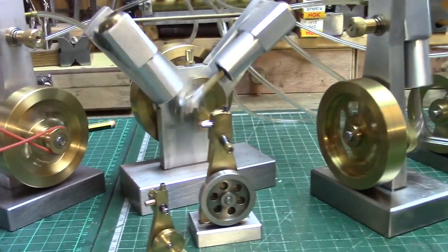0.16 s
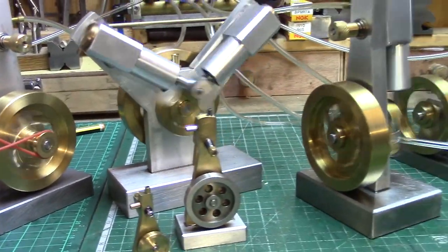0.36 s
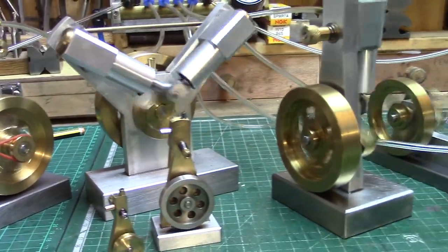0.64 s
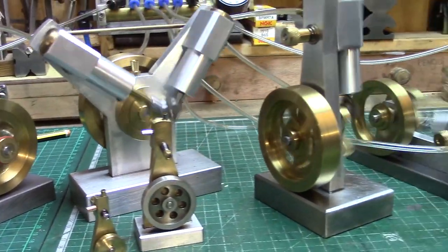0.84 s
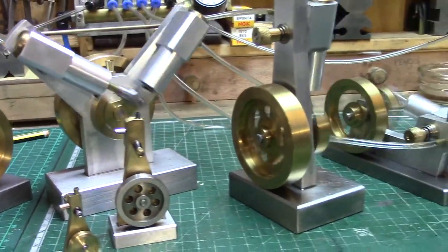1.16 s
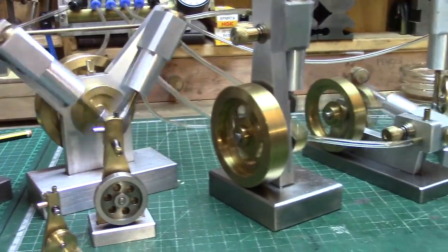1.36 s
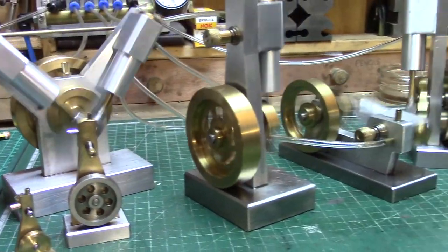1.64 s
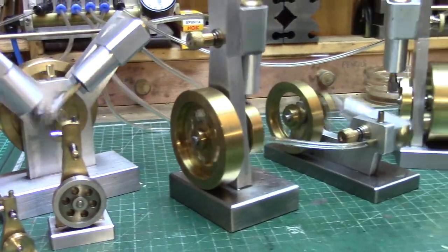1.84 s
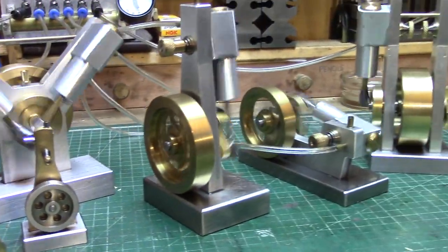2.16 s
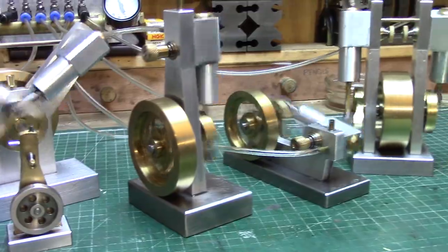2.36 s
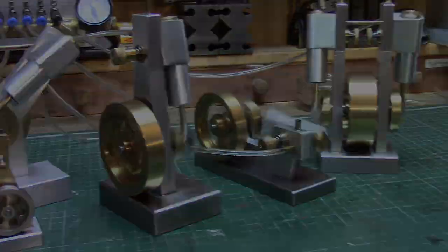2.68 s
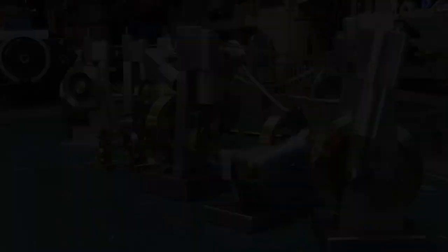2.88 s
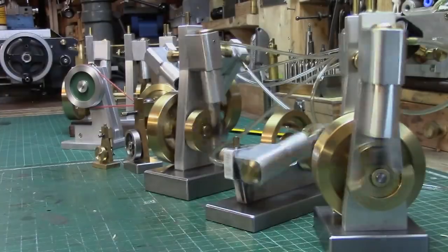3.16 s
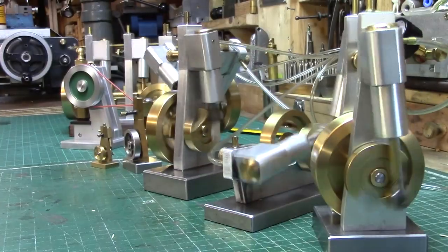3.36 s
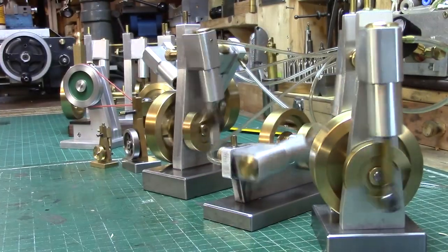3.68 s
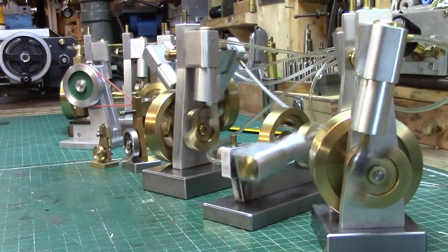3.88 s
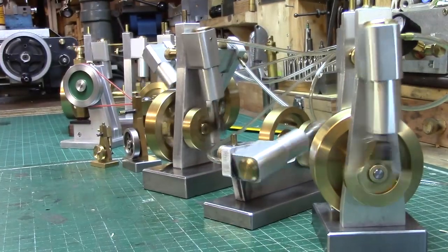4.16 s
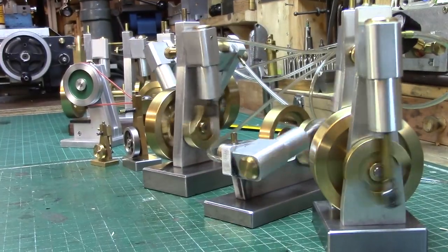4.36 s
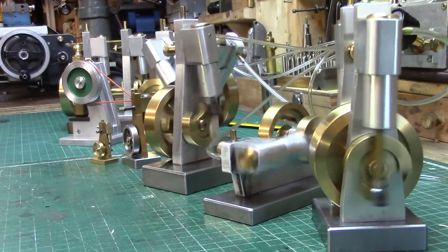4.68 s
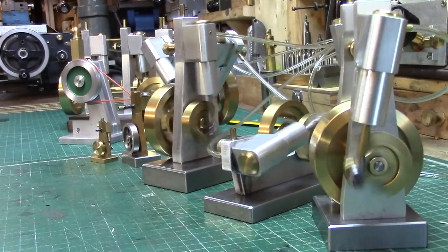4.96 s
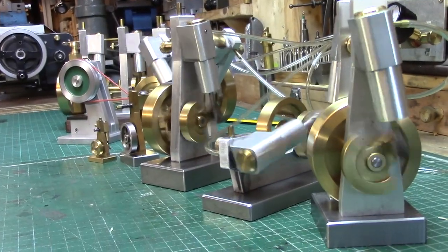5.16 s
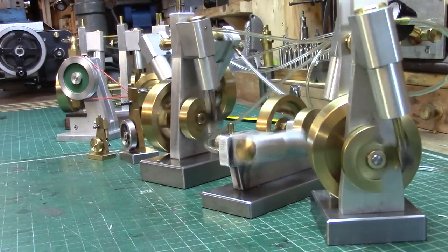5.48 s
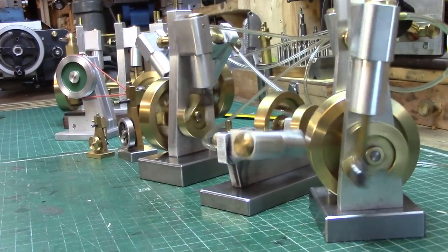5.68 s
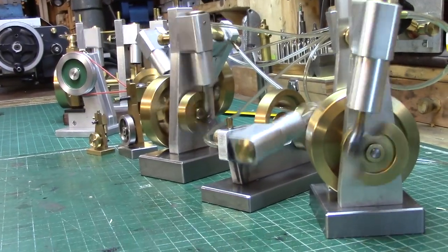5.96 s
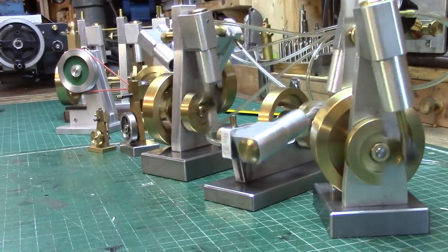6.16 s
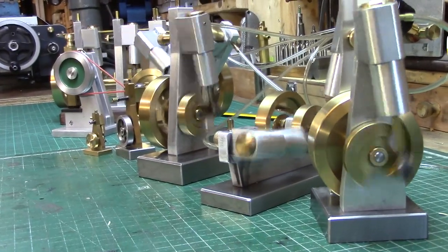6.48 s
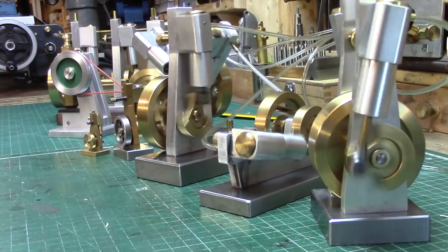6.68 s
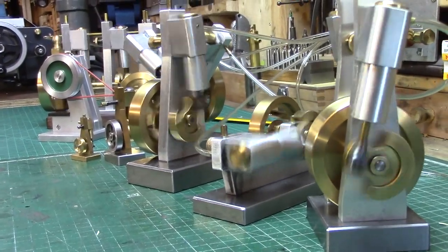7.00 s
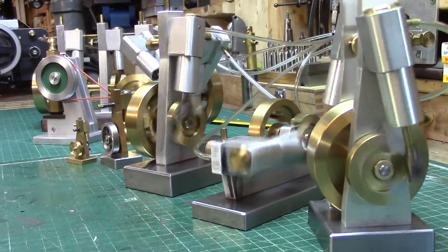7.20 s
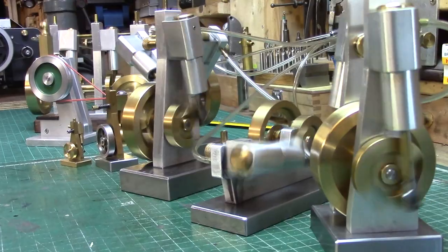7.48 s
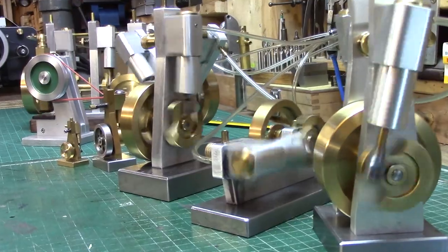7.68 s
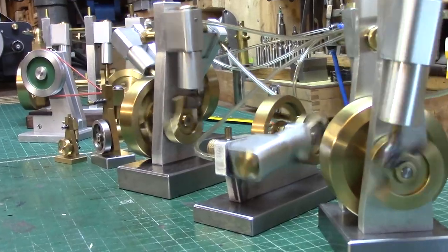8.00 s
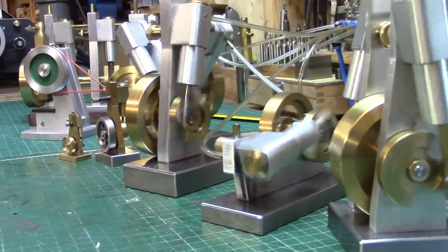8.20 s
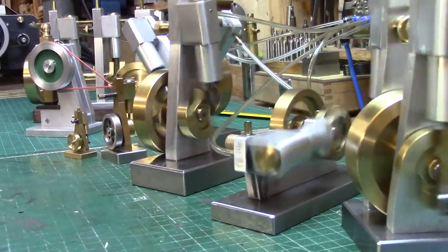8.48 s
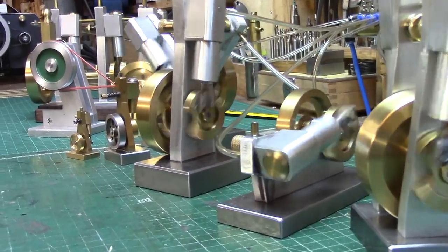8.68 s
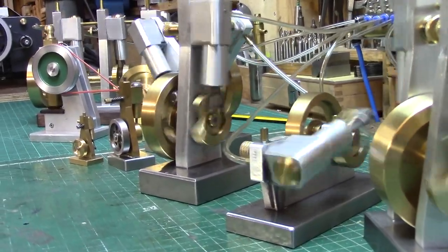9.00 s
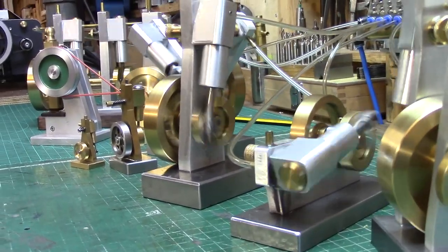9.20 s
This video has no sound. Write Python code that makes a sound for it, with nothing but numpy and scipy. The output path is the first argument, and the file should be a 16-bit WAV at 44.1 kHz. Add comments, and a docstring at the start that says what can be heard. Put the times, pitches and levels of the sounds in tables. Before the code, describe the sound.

Several model steam engines run on a wooden workshop bench. A fast one puffs about ten times a second, with brief squeaks and loose knocks, while steam hisses and spits from valves. A slower engine alternates a ringing metal clank with a dull thump. Around three seconds in, everything fades down, then builds back up, sounding wider and with a little more room echo.

```python
"""A small, fast steam engine puffs, squeaks and knocks on a wooden bench, about ten turns a second.
Each puff is steam let out by its rocking cylinder; the piston squeaks and the loose crank knocks.
A neighbouring engine spits, and steam hisses from leaking valves. A slow engine clanks its flywheel
at one end of its stroke and thumps the bench at the other. About three seconds in, the sound fades
down and comes back from a second listening spot, wider and with more of the room."""
import sys
import numpy as np
from scipy import signal
from scipy.fft import rfft, irfft, next_fast_len
from scipy.io import wavfile
from scipy.ndimage import map_coordinates

SR = 44100
rng = np.random.default_rng(int(sys.argv[2]) if len(sys.argv) > 2 else 0)


def dump_mix(stems):
    """Bounce the given channels to the path in sys.argv[1] as a 16-bit WAV at rate SR."""
    frames = np.atleast_2d(stems).T  # one column per channel
    limited = np.clip(frames, -1, 1)  # hard clip at full scale
    pcm = np.round(limited * 32767).astype(np.int16)
    wavfile.write(sys.argv[1], SR, pcm)


N = 411894
MOVE_S, TOP_HZ = 3.05, 16000  # when the listening spot changes; where the treble ends
TIME = np.arange(N) / SR  # seconds into the scene
AGE = np.arange(SR // 3) / SR  # seconds into one short sound


def amp(db):
    """Turn decibels into a gain."""
    return 10 ** (np.asarray(db) / 20)


def unit(x):
    """Scale a sound to an average (rms) level of 1."""
    return x / np.sqrt(np.mean(x ** 2))


def at(rows, s):
    """Read (time, value) rows at s seconds, joining them with straight lines."""
    return np.interp(s, *np.transpose(rows))


def by_spot(s, first, second):
    """One value at the first listening spot, another at the second."""
    return np.where(s < MOVE_S, first, second)


def clear_of(rows, s, gap_s):
    """True if no event in the table falls within gap_s of this moment."""
    return np.min(np.abs(np.transpose(rows)[0] - s)) > gap_s


def add(track, s, sound):
    """Mix a sound into a track at s seconds."""
    start = max(int(s * SR), 0)
    part = track[start:start + len(sound)]
    part += sound[:len(part)]


def colour(x, tone):
    """Shape a sound's tone with (pitch_hz, level_db) rows; the result has level 1."""
    hz, db = np.transpose(tone)
    size = next_fast_len(len(x))
    log_hz = np.log(np.maximum(np.fft.rfftfreq(size, 1 / SR), 1))
    gain = amp(np.interp(log_hz, np.log(hz), db))
    return unit(irfft(rfft(x, size) * gain, size)[:len(x)])


def wander(rate_hz):
    """A smooth random drift, about 1 in size."""
    steps = rng.standard_normal(N // 8)
    return unit(np.interp(TIME * rate_hz, np.arange(len(steps)), steps))


def swell(centre_s, width_s):
    """A bell-shaped rise and fall."""
    return np.exp(-.5 * ((AGE - centre_s) / width_s) ** 2)


def whistle(hz, width_hz):
    """A rough tone: a narrow band of noise whose pitch may move."""
    phase = 2 * np.pi * np.cumsum(hz * np.ones(N)) / SR
    return unit(wander(width_hz) * np.sin(phase) + wander(width_hz) * np.cos(phase))


def rasp(hz, flutter, flutter_hz=1500):
    """A short tone made raspy by a quick flutter in its pitch."""
    wobble = np.interp(AGE * flutter_hz, np.arange(len(AGE)), rng.standard_normal(len(AGE)))
    return np.sqrt(2) * np.sin(2 * np.pi * np.cumsum(hz * (1 + flutter * wobble)) / SR)


def ring(notes, scatter_db=2, detune=.039, soft_hz=20000):
    """A struck part rings at its own notes; each blow differs, and a soft one spares the high notes."""
    hz, db, fade_s = np.transpose(notes)[:, :, None]
    level_luck, pitch_luck = rng.standard_normal((2, len(notes), 1))
    gain = amp(db + scatter_db * level_luck) / np.sqrt(1 + (hz / soft_hz) ** 4)
    phase = np.float32(2 * np.pi * hz * (1 + detune * pitch_luck) * AGE)
    build = 1 - np.exp(-phase / np.pi)  # a note takes about half a cycle to get going
    fade = np.exp(np.float32(-np.log(1000) * AGE / fade_s))  # 60 dB down after fade_s
    return np.sum(gain * build * fade * np.sin(phase), axis=0)


# The fast engine's crank, its speed drifting up and down: time_s, turns_made
FAST_CRANK = [(0.088, 0), (0.679, 6), (0.993, 9), (1.187, 11), (1.774, 17), (2.174, 21), (2.286, 22),
              (3.37, 33), (3.882, 38), (4.381, 43), (4.772, 47), (4.978, 49), (5.472, 54), (5.655, 56),
              (6.17, 61), (6.464, 64), (6.94, 69), (7.346, 73), (7.723, 77), (8.135, 81), (8.903, 89),
              (9.317, 93)]
def fast_turns():
    """The start time of every turn of the fast engine."""
    s, turns = np.transpose(FAST_CRANK)
    return np.interp(np.arange(turns[-1] + 1), turns, s)


# Loudness of the steam, dipping around the move: time_s, level_db
STEAM_LEVEL = [(0, 1), (2.55, 0), (3.15, -21), (3.65, -10), (4.7, -6.5), (5.4, -2), (6.3, -0.5),
               (7.7, -0.5), (9.34, 1.5)]
# Tone of the leaking valves: pitch_hz, level_db
LEAK_TONE = [(30, -43), (110, -24), (205, 8), (700, 6.5), (1100, -5.5), (1900, 0.5), (2700, 3), (4200, -1),
             (7300, 0.5), (8900, -3), (11200, 3.5), (12700, -0.5), (16000, -15)]
def leaks(ease_db=1.5, ease_turn=.95, surge_db=4):
    """Steam slips out between the rocking cylinders and their valve faces; pistons scrape softly."""
    hiss = colour(rng.standard_normal(N) * amp(1.5 * wander(1200)), LEAK_TONE) * amp(2.2 * wander(60))
    scrape_hz = by_spot(TIME, 2950, 2600) * (1 + .056 * wander(30))
    scrape_db = by_spot(TIME, -8, -10.5) + 3.5 * wander(70)
    scrape = whistle(scrape_hz, width_hz=600) * amp(scrape_db)
    sizzle = whistle(7150 * (1 + .02 * wander(8)), width_hz=650) * amp(-10.5 + 3 * wander(40))
    sizzle += whistle(11100 * (1 + .008 * wander(8)), width_hz=450) * amp(-13 + 3 * wander(25))
    # the leak eases once per turn of the fast engine and surges once per turn of its neighbour
    easing = ease_db * np.cos(2 * np.pi * (at(FAST_CRANK, TIME) - ease_turn))
    neighbour_turns = np.interp(TIME, np.transpose(VALVE_SPITS)[0], np.arange(len(VALVE_SPITS)))
    surge = surge_db * np.cos(2 * np.pi * neighbour_turns)
    level_db = at(STEAM_LEVEL, TIME) + by_spot(TIME, -36, -39) - easing + surge
    return (hiss + scrape + sizzle) * amp(level_db)


# The fast piston's clearer squeaks: peak_s, level_db
CLEAR_SQUEAKS = [(.043, -25), (.143, -23), (.21, -30), (.662, -26), (1.046, -22.5), (1.238, -27),
                 (1.44, -26.5), (1.534, -25), (1.73, -30), (1.832, -30.5), (2.336, -25), (3.938, -37),
                 (4.139, -36), (4.432, -36), (4.535, -36.5), (4.931, -36), (5.031, -33.5), (5.131, -31.5),
                 (5.231, -35), (5.331, -30.5), (6.42, -30), (6.512, -34), (6.612, -25), (6.693, -32),
                 (7.099, -29), (7.3, -29), (7.492, -30), (8.19, -29.5), (8.285, -28.5), (8.476, -29.5),
                 (8.569, -27)]
def squeaks(faint_db=-37, lead_s=.03, rise=.06):
    """The fast piston gives a brief, raspy, rising squeak on each return stroke, mostly a faint one."""
    out = np.zeros(N)
    push = .86 * swell(lead_s, .0034) + .14 * swell(lead_s, lead_s / 2)
    faint = [(s, faint_db + at(STEAM_LEVEL, s) + 2 * rng.standard_normal())
             for s in fast_turns() + .052 if clear_of(CLEAR_SQUEAKS, s, lead_s)]
    for s, db in list(CLEAR_SQUEAKS) + faint:
        pitch_luck, rise_luck = rng.standard_normal(2)
        glide = rise * (1 + .5 * rise_luck) * np.tanh((AGE - lead_s) / .008)
        hz = by_spot(s, 2780, 2640) * (1 + .025 * pitch_luck + glide)
        add(out, s - lead_s, amp(db) * push * rasp(hz, flutter=.07))
    return out


# Loudness of the small sounds carried by the bench: time_s, level_db
BENCH_LEVEL = [(0, -1), (2.55, 0.5), (3.15, -22), (3.6, -12.5), (4.5, -13), (5.7, -2), (7, 2.5), (9.34, 3)]
def ticks(low_hz=800, high_hz=4200, fade_s=.032, count=220):
    """Loose pins and links tick at random, each with three short metallic notes."""
    out = np.zeros(N)
    for s in rng.uniform(0, N / SR, count):
        notes = [(hz, 0, fade_s) for hz in low_hz * (high_hz / low_hz) ** rng.random(size=3)]
        db = by_spot(s, -35, -40.5) + at(BENCH_LEVEL, s) + 4 * rng.standard_normal()
        add(out, s, amp(db) * ring(notes))
    return out


# Tone of steel hitting steel: pitch_hz, level_db
CRACK_TONE = [(150, -53), (400, 11.5), (800, 0.5), (1200, -5.5), (2000, 0), (2900, 5.5), (3800, 2),
              (5500, -3), (8000, 0.5), (11000, 5), (16000, -8)]
def crack(decay_s, tail_db, tail_s, soft_hz):
    """Steel hits steel and loose parts rattle briefly; oil dulls the treble."""
    fade = np.exp(-AGE / decay_s) + amp(tail_db) * np.exp(-AGE / tail_s)
    grit = colour(rng.standard_normal(len(AGE)), CRACK_TONE) * fade
    return signal.sosfilt(signal.butter(2, soft_hz, fs=SR, output="sos"), grit)


# Notes of the wooden bench top: pitch_hz, level_db, fade_s
BENCH_NOTES = [(133, -8.5, 0.065), (200.7, -8, 0.47), (231.8, 3, 0.18), (264.6, -7, 0.41),
               (306.5, 1.5, 0.14), (368.4, 1, 0.19), (429, -6.5, 0.16), (748.6, 2, 0.12)]
# Notes of the flywheel and crank: pitch_hz, level_db, fade_s
FLYWHEEL_NOTES = [(4502, -18, .32), (4490, 0, .09), (4370, -13, .06), (4720, -16, .045), (2900, -18, .06),
                  (7690, -14, .06)]
# Tone of steel grating on the flywheel's shaft: pitch_hz, level_db
GRATE_TONE = [(2000, -31), (3900, -31), (4250, -17), (4420, 3), (4560, 0.5), (4720, -12), (5250, -10),
              (5800, -31), (9000, -40)]
# The slow engine's clanks, one a turn: start_s, blow_db, bench_db, ring_db, grate_db
SLOW_CLANKS = [(0.0714, -6.5, -26.5, -15, -14), (0.716, -6.5, -26.5, -15.5, -16),
               (1.3677, -4.5, -24.5, -17, -21), (2.0056, -7, -30, -6.5, -21),
               (2.6616, -11.5, -33, -16.5, -18), (3.597, -24, -59, -39, -31), (4.229, -24, -49, -36, -32.5),
               (4.8536, -15, -43, -29, -23), (5.487, -15, -39.5, -25, -21), (6.1246, -9, -36, -37, -28),
               (6.754, -13.5, -34, -19.5, -21), (7.3971, -12, -33, -27, -30),
               (8.0147, -13, -32, -10.5, -20), (8.649, -9, -33, -16, -21), (9.261, -13.5, -33, -19, -26)]
def clanks(rebound_s=.0049, grate_s=.015):
    """The slow crank strikes, bounces once and grates briefly; a clean blow rings its flywheel."""
    out, grating = np.zeros((2, N))
    spread = np.tanh(AGE / .003)  # the ring takes a moment to spread through the wheel
    for s, blow_db, bench_db, ring_db, grate_db in SLOW_CLANKS:
        contact = amp(-2.5) * crack(.0023, tail_db=-9, tail_s=.016, soft_hz=9000)
        add(out, s, amp(blow_db) * contact + amp(bench_db) * ring(BENCH_NOTES, soft_hz=1470))
        add(out, s + rebound_s, amp(blow_db - 11.5) * contact)
        add(out, s, amp(ring_db) * spread * ring(FLYWHEEL_NOTES, scatter_db=1, detune=.0014))
        add(grating, s, amp(grate_db) * spread * np.exp(-AGE / grate_s))
    return out + grating * colour(rng.standard_normal(N), GRATE_TONE)


# Tone of the exhaust jet heard from the side: pitch_hz, level_db
JET_SIDE_TONE = [(300, -60), (1000, -22), (2800, -15), (4300, -21.5), (5400, -6), (6500, -3), (9300, -1.5),
                 (10800, 2.5), (11600, -16), (12400, -17), (14400, -9), (16000, -30)]
# The same jet heard from the front: pitch_hz, level_db
JET_FRONT_TONE = [(150, -53), (1000, -21), (2500, -15), (4300, -22), (5400, -14), (7500, -9), (9300, -5.5),
                  (10600, 2.5), (11400, -4.5), (12300, -7.5), (14000, -20.5), (16000, -33)]
def jet(s, pitch_luck, sputter_db=2):
    """Rushing, sputtering steam; pressure and wetness give each puff its own tone."""
    hz, db = np.transpose(by_spot(s, JET_SIDE_TONE, JET_FRONT_TONE))
    droplets = np.repeat(rng.standard_normal(len(AGE)), repeats=14)[:len(AGE)]
    flow = rng.standard_normal(len(AGE)) * amp(sputter_db * droplets)
    tone = np.transpose([hz * (1 + .018 * pitch_luck), db + 2.2 * rng.standard_normal(len(hz))])
    return colour(flow, tone)


def puffs(open_s=.038, shut_s=.0017, slop_s=.0011, edge_hz=10600):
    """Each turn the fast engine's exhaust port opens with a blast, then the piston pushes out the rest."""
    out = np.zeros(N)
    for s in fast_turns():
        open_luck, close_luck, blast_luck, stroke_luck, edge_luck, jet_luck = rng.standard_normal(6)
        # the rocking cylinder uncovers the port a little early or late
        early_s = slop_s * np.clip(open_luck + .6, -1, 3)
        close_s = open_s + early_s + slop_s * close_luck
        opening = np.minimum(AGE / (.0034 + early_s), 1)
        closing = .5 * (1 - np.tanh((AGE - close_s) / (2 * shut_s)))
        burst = swell(.0046 + early_s, .0039)
        pinch = swell(close_s - .003, .003)  # the jet sharpens as the port closes
        blast = amp(-19 + 1.4 * blast_luck) * burst
        stroke = amp(-28.5 + 1.4 * stroke_luck) * (1 + .57 * pinch)
        # the edge of the port sings, higher while the steam is fast
        hz = edge_hz * (1 + .0392 * (burst + pinch) + .012 * edge_luck)
        edge = amp(by_spot(s, -5, -3)) * rasp(hz, flutter=.03)
        strength = amp(at(STEAM_LEVEL, s)) * opening * closing * np.hypot(blast, stroke)
        add(out, s - early_s, strength * (jet(s, jet_luck) + edge))
    return out


# Tone of the soft cloud of spent steam: pitch_hz, level_db
CLOUD_TONE = [(150, -30), (500, 0), (950, 3), (1900, 0.5), (2800, 1), (3800, -3.5), (5200, 0.5), (7000, -2),
              (12000, -32)]
def clouds(build_s=.0083, decay_s=.028):
    """Spent steam billows out behind each puff: softer, lower and slower to build."""
    flow = np.zeros(N)
    billow = np.minimum(AGE / build_s, 1) * np.exp(-np.maximum(AGE - build_s, 0) / decay_s)
    for s in fast_turns():
        db = by_spot(s, -32, -37) + at(STEAM_LEVEL, s) + 1.5 * rng.standard_normal()
        add(flow, s, amp(db) * billow)
    return flow * colour(rng.standard_normal(N), CLOUD_TONE)


# Notes of a small engine's base plate: pitch_hz, level_db, fade_s
PLATE_NOTES = [(425, 4, 0.034), (472, 6.3, 0.036), (651, -4, 0.03)]
def knock():
    """The crank knocks through its base plate, and the bench top sways briefly under it."""
    sway_hz = 197 * (1 + .05 * rng.standard_normal())
    sway = np.tanh(AGE / .008) * np.exp(-AGE / .051) * np.sin(2 * np.pi * sway_hz * AGE)
    plate = ring(PLATE_NOTES, scatter_db=2.5, detune=.036)
    bench = ring(BENCH_NOTES, soft_hz=655)
    tick = crack(.005, tail_db=0, tail_s=.008, soft_hz=3600)
    return amp(-5.5) * plate + amp(-17) * bench + amp(-10) * sway + amp(-19) * tick


# Gentle taps as the fast crank takes up its slack: after_puff_s, level_db
SLACK_TAPS = [(.004, -36.5), (0.031, -34), (0.05, -29), (.071, -34)]
# Hard knocks of the fast crank: start_s, level_db
HARD_KNOCKS = [(0.158, -19), (0.428, -22), (0.528, -20), (0.63, -24.5), (0.813, -18), (1.042, -22),
               (1.331, -22), (1.447, -19), (1.82, -18), (1.92, -19), (2.102, -18), (2.334, -20.5),
               (2.728, -24.5), (4.622, -28.5), (4.722, -27.5), (4.822, -34), (5.611, -22), (5.706, -19.5),
               (5.805, -18.5), (5.909, -17.5), (6.014, -19), (6.594, -27.5), (6.892, -25.5), (7.083, -30),
               (7.192, -24.5), (7.464, -27), (7.58, -22.5), (7.677, -19), (7.773, -19.5), (7.875, -19.5),
               (7.978, -22), (8.165, -25), (8.363, -24), (8.456, -21.5), (8.554, -20.5), (8.754, -14),
               (8.855, -25), (8.955, -15), (9.248, -24)]
def loose_crank(fall_back_s=.024):
    """The crank taps at the same points of every turn; on some turns it knocks hard and falls back."""
    out = np.zeros(N)
    for s, db in HARD_KNOCKS:
        add(out, s, amp(db) * knock())
        add(out, s + fall_back_s, amp(db - 10) * knock())
    for puff_s in fast_turns():
        for after_puff_s, db in SLACK_TAPS:
            s = puff_s + after_puff_s
            tap_db = db + at(BENCH_LEVEL, s) + by_spot(s, .5, 0) + 3.5 * rng.standard_normal()
            add(out, s, amp(tap_db) * knock() * clear_of(HARD_KNOCKS, s, gap_s=.012))
    return out


def patter(count=200):
    """The smaller engines patter faintly on the bench at random moments."""
    taps = np.zeros(N)
    taps[rng.integers(0, N, count)] = amp(3.5 * rng.standard_normal(count))
    bench = amp(-50) * ring(BENCH_NOTES, soft_hz=505)
    return signal.fftconvolve(taps, bench)[:N] * amp(at(BENCH_LEVEL, TIME))


# Tone of the neighbouring valve's jet: pitch_hz, level_db
SPIT_TONE = [(500, -24), (2700, -25), (4200, -23), (5800, -15), (7200, 14), (9000, -24), (11300, 12.5),
             (12600, -12), (16000, -20)]
# The neighbouring engine's spits, one a turn: peak_s, level_db
VALVE_SPITS = [(.13, -26.5), (.35, -35), (.51, -30), (.665, -25), (.861, -25), (1.057, -25), (1.242, -24.5),
               (1.42, -32), (1.62, -25), (1.826, -28.5), (1.99, -37), (2.15, -43), (2.36, -33),
               (2.551, -27.5), (2.73, -38), (2.93, -49), (3.22, -55), (3.43, -45), (3.62, -43), (3.76, -61),
               (3.96, -46), (4.15, -43), (4.35, -48), (4.55, -40), (4.73, -42), (4.909, -43), (5.06, -39),
               (5.25, -34), (5.44, -38), (5.62, -46), (5.82, -40), (6.03, -49), (6.21, -34), (6.39, -43),
               (6.536, -29.5), (6.715, -31), (6.9, -37), (7.09, -31), (7.25, -42), (7.495, -44), (7.7, -48),
               (7.83, -30), (7.993, -35), (8.19, -45), (8.37, -32), (8.57, -49), (8.7, -48), (8.87, -51),
               (9.06, -51), (9.27, -38)]
def spits(lead_s=.03, width_s=.0088):
    """The neighbouring valve spits steam once a turn, some turns wetter than others."""
    flow = np.zeros(N)
    for s, db in VALVE_SPITS:
        add(flow, s - lead_s, amp(db) * swell(lead_s, width_s))
    return flow * colour(rng.standard_normal(N), SPIT_TONE)


# The slow engine's drops onto its base: start_s, thud_db, crack_db, ring_db
SLOW_THUMPS = [(0.3284, -13, -16, -36), (.951, -12.5, -16, -29.5), (1.6175, -13.5, -18, -26.5),
               (2.245, -14.5, -18, -23), (2.896, -30.5, -33, -43), (3.833, -41, -37, -60),
               (4.459, -34, -31.5, -48), (5.099, -28, -27, -38), (5.735, -26.5, -25.5, -36),
               (6.374, -21.5, -24, -35), (6.9981, -20.5, -23, -48), (7.636, -20.5, -26, -34),
               (8.2447, -18, -22, -28), (8.883, -19, -24.5, -34)]
def thumps(first_gap_s=.084, shrink=.72, loss_db=-2.5, heave_hz=118):
    """Once a turn the slow engine drops onto its base, which rocks on in quicker, weaker bounces."""
    out, rub, grating = np.zeros((3, N))
    heave = swell(.021, .006) * np.sin(2 * np.pi * heave_hz * AGE)
    for s, thud_db, crack_db, ring_db in SLOW_THUMPS:
        # a light touch, then the full bite of steel
        add(out, s, amp(crack_db - 3) * crack(.0022, tail_db=1, tail_s=.0043, soft_hz=4020))
        add(out, s + .0055, amp(crack_db) * crack(.001, tail_db=1.5, tail_s=.013, soft_hz=4900))
        add(rub, s + .005, amp(ring_db) * (np.exp(-AGE / .02) + amp(-8) * np.exp(-AGE / .11)))
        add(grating, s, amp(crack_db - 13) * swell(.014, .008))
        add(out, s, amp(thud_db - 6.5) * ring(BENCH_NOTES, soft_hz=360))
        heave_db = thud_db + by_spot(s, -16, -5.5)
        for bounce in range(4):
            thud = amp(heave_db) * heave + amp(thud_db - 11) * ring(BENCH_NOTES, soft_hz=293)
            add(out, s, amp(bounce * loss_db) * thud)
            s = s + first_gap_s * shrink ** bounce
    out += grating * colour(rng.standard_normal(N), GRATE_TONE)
    # the crank rubs for a moment after each drop, so the flywheel sings unevenly
    singing = .7 * np.sin(2 * np.pi * 4500 * TIME) + .6 * whistle(4497, width_hz=110)
    return out + rub * singing


# Left side against right at the second spot: pitch_hz, louder_db
LEFT_LOUDER = [(60, -18), (110, 2), (200, -3.5), (380, 0), (700, 6.5), (1290, 7.5), (2380, 3), (4400, 4.5),
               (8120, 3.5), (15000, -0.5)]
# How far the left side's wave runs ahead there: pitch_hz, lead_radians
LEFT_AHEAD = [(60, -0.22), (130, 0.11), (260, 0.18), (500, 1), (1000, 1), (1800, -1.67), (2900, 1),
              (4400, -0.39), (10000, -0.39), (14000, -0.37)]
def place(x):
    """Centred at the first spot; at the second, the two sides differ in level and timing."""
    size = next_fast_len(N)
    log_hz = np.log(np.maximum(np.fft.rfftfreq(size, 1 / SR), 1))
    db, lead = (np.interp(log_hz, np.log(hz), values)
                for hz, values in (np.transpose(LEFT_LOUDER), np.transpose(LEFT_AHEAD)))
    sides = np.array([[.5], [-.5]])
    wide = irfft(rfft(x, size) * amp(sides * db) * np.exp(1j * sides * lead), size)[:, :N]
    return by_spot(TIME, x, wide)


def room(x, fade_s=.15):
    """A cluttered room adds a short echo, different on each side."""
    tone = [(60, 16), (250, 12), (700, 2), (1700, 4.5), (3000, 6.2), (5000, 16.2), (12000, 4)]
    fade = np.exp(-np.log(1000) * AGE / fade_s) * (AGE > .002)
    tails = [colour(rng.standard_normal(len(AGE)), tone) * fade for _ in range(2)]
    return np.array([signal.fftconvolve(x, tail / np.linalg.norm(tail))[:N] for tail in tails])


def scene(bounce_s=.0022, bounce_db=-12, first_room_db=-21, second_room_db=-11):
    """All the engines on one bench; the second spot is wider and hears more of the room."""
    # the bench top throws the steam's sound back, along a path that changes as the listener sways
    lag_s = bounce_s * (1 + .06 * wander(1))
    jets, hiss = (x + amp(bounce_db) * map_coordinates(x, [(TIME - lag_s) * SR], order=3)
                  for x in (puffs() + clouds(), spits() + leaks()))
    sources = [jets, hiss, squeaks() + loose_crank() + patter() + ticks(), clanks() + thumps()]
    echo = sum(room(x) for x in sources) * amp(by_spot(TIME, first_room_db, second_room_db))
    return place(sum(sources)) + echo


def record(dry):
    """Cut the deep bass, round off the loudest peaks and cut the highest treble."""
    thinned = signal.sosfilt(signal.butter(3, 68, "high", fs=SR, output="sos"), dry)
    rounded = .85 * np.tanh(thinned / .85)
    return signal.sosfilt(signal.ellip(8, .2, 80, TOP_HZ, fs=SR, output="sos"), rounded)


dry = scene()
out = record(dry)
dump_mix(out)
```